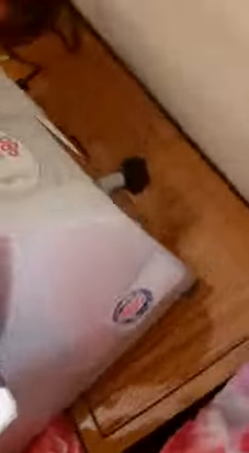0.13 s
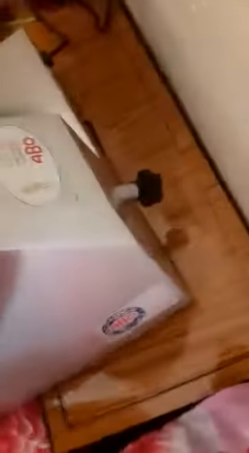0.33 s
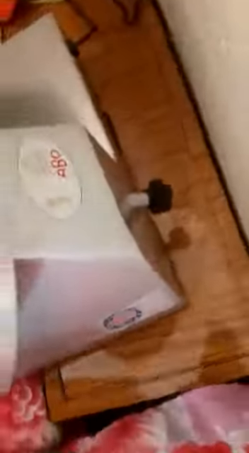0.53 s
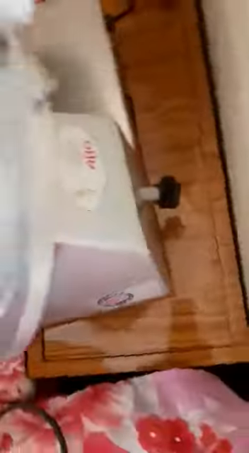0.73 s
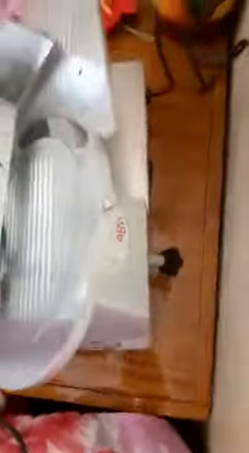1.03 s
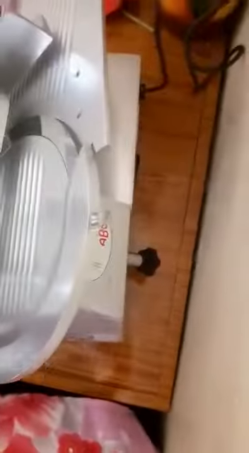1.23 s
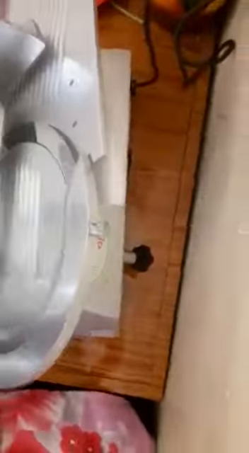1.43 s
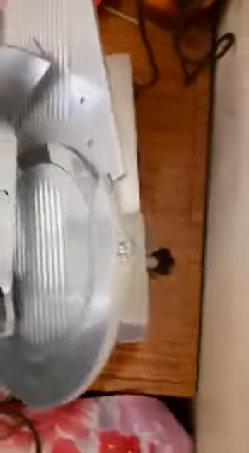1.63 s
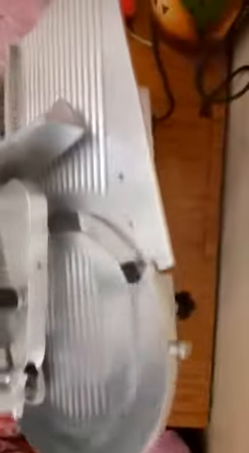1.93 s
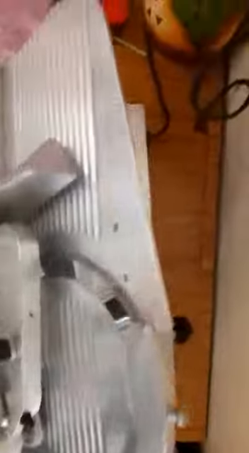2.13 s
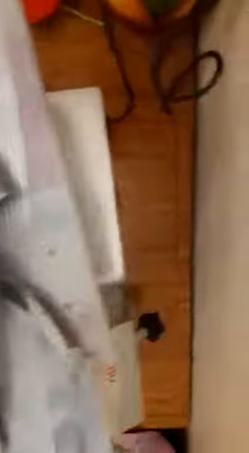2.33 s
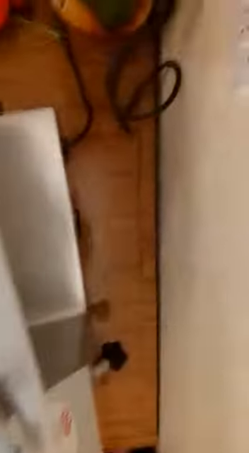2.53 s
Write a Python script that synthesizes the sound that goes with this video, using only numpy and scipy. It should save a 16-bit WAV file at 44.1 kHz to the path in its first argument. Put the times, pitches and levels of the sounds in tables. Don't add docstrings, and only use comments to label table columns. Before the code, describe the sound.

Constant low mains-like motor hum from a slicing machine, with a thin metallic ringing and soft hiss. Early bright handling ticks, brief low air puffs around one second, then a sharp knock near two seconds, recorded close indoors on a moving phone.

```python
import sys
import numpy as np
from scipy import signal
from scipy.fft import rfft, irfft, next_fast_len
from scipy.io import wavfile
from scipy.ndimage import uniform_filter1d

SR = 44100
rng = np.random.default_rng(int(sys.argv[2]) if len(sys.argv) > 2 else 0)


def bounce(signal):
    frames = np.transpose(np.atleast_2d(signal))
    limited = np.clip(frames, -1, 1)
    pcm = np.round(limited * 32767).astype(np.int16)
    wavfile.write(sys.argv[1], SR, pcm)


def voltage_ratio(level):
    return 10 ** (np.asarray(level, float) / 20)


N = 118188

HUM_HZ, HUM_PAN_DB = 100.16, 0.6
AIR_FADE_DB = -4


def evened(x):
    return x / np.sqrt(np.mean(x ** 2) + 1e-20)


def read(points, hz):
    f, value = np.transpose(points)
    return np.interp(np.log(hz + 1), np.log(f + 1), value)


def walk(column):
    # (time [s], hum level [dB], place [0-1], housing ring level [dB])
    stations = np.array([(0, -19.5, 0.15, -3), (.2, -20.5, 0.11, -1.5), (.55, -20, 0.22, 0.5),
                         (.87, -21, 0.32, 1.5), (1.1, -20, 0.5, 0.5), (1.45, -20.5, 0.53, 0),
                         (1.75, -19, 0.74, 1), (2.0, -18.5, 1, -2), (2.2, -18.3, 0.97, 4),
                         (2.43, -18.3, 0.97, -3.5), (2.54, -18, 1, 7.5), (2.68, -18.5, 0.53, 3.5)])
    return np.interp(np.arange(N) / SR, stations[:, 0], stations[:, column])


def panned(db):
    return voltage_ratio(np.array([[db / 2], [-db / 2]]))


def resonate(x, hz, width_hz):
    radius = np.exp(-np.pi * width_hz / SR)
    return signal.lfilter([1 - radius], [1, -2 * radius * np.cos(2 * np.pi * hz / SR), radius ** 2], x)


def pair(same):
    a, b = rng.standard_normal((2, N))
    same = np.clip(same, -1, 1)
    return np.array([a, same * a + np.sqrt(1 - same ** 2) * b])


def drift(hz):
    t = np.arange(0, N + 64, 64) / SR
    rates = hz * np.geomspace(.1, 1, num=12)
    slow = sum(np.sin(2 * np.pi * (f * t + rng.random())) for f in rates)
    return evened(np.interp(np.arange(N) / SR, t, slow))


def bursts(rows, edge_s):
    t = np.arange(N) / SR
    total = 0
    for start, length, db in rows:
        inside = np.minimum(t - start, start + length - t)
        total = total + voltage_ratio(db) * np.clip(inside / edge_s + .5, 0, 1)
    return total


def hiss(shape_db, same):
    a, b, c, d, patches = rng.standard_normal((shape_db.shape[-1], 513, 5)).T
    patches = uniform_filter1d(patches, size=12, axis=0)
    patches = evened(uniform_filter1d(patches, size=8, axis=1))
    left = a + 1j * b
    right = same * left + np.sqrt(1 - same ** 2) * (c + 1j * d)
    z = np.array([left, right]) * voltage_ratio(shape_db + 0.9 * patches)
    return signal.istft(z, nperseg=1024, noverlap=768)[1][:, :N]


def air():
    # (frequency [Hz], level [dB per Hz])
    air_spectrum = [(25, -11), (88, 9.5), (170, 5.5), (560, 0), (2300, -7.5), (4400, -15.5), (4900, -19),
                    (7000, -26.5)]
    # (frequency [Hz], left-right correlation [-1 to 1])
    coherence = [(25, .84), (60, .97), (250, .93), (640, .45), (1200, -.15), (3000, .02)]
    # (frequency [Hz], left-right level [dB])
    port_lean = [(60, .5), (500, 0), (1290, -2.5), (2380, -6), (4400, -2), (8000, 2)]
    hz = np.fft.rfftfreq(1024, 1 / SR)
    place = np.pad(walk(column=2)[::256], (0, 5), "edge")
    steady = read(air_spectrum, hz) - np.maximum(hz - 7000, 0) / 1000
    fade = AIR_FADE_DB * place / (1 + (hz[:, None] / 1500) ** 2)
    shape = steady[:, None] + fade
    lean = read(port_lean, hz)[:, None] / 2
    same = np.clip(read(coherence, hz), -1, 1)[:, None]
    x = hiss(np.array([shape + lean, shape - lean]), same)
    band = signal.butter(2, [600, 2200], "band", fs=SR, output="sos")
    return voltage_ratio(-47.5) * x / np.std(signal.sosfilt(band, x.mean(0)))


def puffs():
    # (start [s], length [s], level [dB])
    gusts = [
        (1.01, .07, -40),
        (1.1, 0.054, -34),
        (1.2, 0.09, -38),
        (2.53, 0.045, -35),
    ]
    band = signal.butter(2, [45, 111], "band", fs=SR, output="sos")
    return evened(signal.sosfilt(band, pair(-.3))) * bursts(gusts, .03)


def rubs():
    # (start [s], length [s], level [dB])
    slides = [(0, .1, -56), (.11, 0.091, -51.5), (.26, 0.095, -50), (.4, 0.24, -60.5), (.66, 0.055, -58),
              (.78, 0.2, -57.5), (1.36, 0.14, -59), (1.61, 0.13, -57.5), (1.88, .06, -59), (2.19, .05, -54),
              (2.32, 0.082, -51), (2.44, 0.03, -65), (2.63, 0.036, -58)]
    # (frequency [Hz], level [dB])
    friction = [(2500, -24), (5000, 2.5), (8000, -5.5), (9000, 0.5), (12000, -1.5), (15700, -4)]
    grip_db = -59.5
    hz = np.fft.rfftfreq(1024, 1 / SR)
    x = evened(hiss(read(friction, hz)[:, None] + np.zeros(N // 256 + 6), 0.044))
    level = np.hypot(bursts(slides, 0.041), voltage_ratio(grip_db))
    return x * panned(4.5) * level * voltage_ratio(1.6 * drift(60))


def ticks():
    # (time [s], level [dB], centre frequency [Hz], left-right level [dB])
    snaps = [
        (0.131, -48.5, 5000, 11.5),
        (0.164, -53, 6000, 6),
        (0.3816, -43, 8800, 4),
        (.4209, -41.5, 11000, 5),
        (0.9022, -44, 7400, 0),
        (1.9141, -39, 4250, 2),
        (1.914, -29.5, 2400, -2),
        (2.3256, -47, 8300, 5),
    ]
    case_t60_s, room_t60_s, room_db = 0.0084, 0.43, -4.5 - 14
    q = 7.5
    t = np.arange(8000) / SR
    shape = voltage_ratio(-60 * t / case_t60_s) + voltage_ratio(room_db - 60 * t / room_t60_s)
    out = np.zeros((2, N + 8000))
    draws = rng.standard_normal((len(snaps), 2, 8000))
    for (s, db, hz, pan_db), z in zip(snaps, draws):
        edges = [hz / (1 + 1 / q), min(hz * (1 + 1 / q), .45 * SR)]
        band = signal.butter(1, edges, "band", fs=SR, output="sos")
        snap = evened(signal.sosfilt(band, z)) * shape
        out[:, round(s * SR):][:, :8000] += voltage_ratio(db) * panned(pan_db) * snap
    return out[:, :N]


def thud():
    start_s, hz, level_db, t60_s = 1.903, 750, -42, .35
    t = np.maximum(np.arange(N) / SR - start_s, 0)
    return voltage_ratio(level_db - 60 * t / t60_s) * (t > 0) * evened(resonate(pair(.5), hz, 200))


def body():
    # (frequency [Hz], width [Hz], level [dB], left-right level [dB], left-right correlation [-1 to 1])
    modes = [(254, 47, -59.5, -16, 0.94), (385.7, 38, -46.5, -2, 1), (505, 230, -53, 7, 1),
             (965, 170, -55.5, 0, 0.29), (2400, 154, -62, -9, 0.66)]
    shudder = (98, 19.7, -38.5, HUM_PAN_DB, 1)
    out = 0
    for hz, width_hz, db, pan_db, same in modes + [shudder]:
        rumble = resonate(resonate(pair(same), hz, width_hz), hz, 2 * width_hz)
        level = voltage_ratio(db + AIR_FADE_DB * walk(column=2) * (200 < hz < 1500))
        out = out + level * panned(pan_db) * evened(rumble)
    return out


def ring():
    shaft_hz, ring_hz, width_hz = 42.5, 2603, 115
    knock_share = .45
    knocks = np.zeros(N)
    at = np.arange(0, N - 1, SR / shaft_hz).round().astype(int)
    knocks[at] = voltage_ratio(2.0 * rng.standard_normal(len(at)))
    drive = knock_share * evened(knocks) + np.sqrt(1 - knock_share ** 2) * pair(.7)
    rung = evened(resonate(resonate(drive, ring_hz, width_hz), ring_hz, 2 * width_hz))
    return voltage_ratio(-52.5 + walk(column=3) + 0.62 * drift(14)) * panned(-10) * rung


def slots():
    slot_hz, wobble_db = 942.2, 2
    # (left level [dB], right level [dB])
    slot_lines = [(-61.5, -62.5), (-59.5, -59), (-60.5, -58.5)]
    # (lower [dB], centre [dB], upper [dB])
    slot_fades = (1, -7, -2)
    t = np.arange(N) / SR
    out = 0
    for k, dbs in enumerate(slot_lines):
        port_shift = np.array([[0], [1]]) * .7 * drift(1)
        phase = 6 * rng.random() + .4 * drift(1.5) + port_shift
        wobble = wobble_db * np.array([drift(3.3), drift(2.805)])
        level = voltage_ratio(np.array(dbs)[:, None] + slot_fades[k] * walk(column=2) + wobble)
        line_hz = slot_hz + (k - 1) * HUM_HZ
        out = out + np.sqrt(2) * level * np.cos(2 * np.pi * line_hz * t + phase)
    return out


def hum():
    start_rad, skew_rad = 2.1, -4.6
    # (level at place 0 [dB], at 0.5 [dB], at 1 [dB], left-right [dB], left lead [rad])
    overtones = [(-43, -47, -56, -2.5, .35), (-42, -50, -48, 1, .45), (-42.5, -44.5, -47, .3, .65),
                 (-57, -62, -68, 3, .1)]
    hum_leads = (.04, .11, -.07)
    # (time [s], phase shift [rad])
    path_phase = [(0, .2), (1.5, -.2), (2.4, 0), (2.68, .5)]
    t = np.arange(N) / SR
    turn = 2 * np.pi * HUM_HZ * t + start_rad
    place, side = walk(column=2), np.array([[.5], [-.5]])
    lead = np.interp(place, [0, .6, 1], hum_leads)
    path = np.interp(t, *np.transpose(path_phase))
    out = voltage_ratio(walk(column=1)) * panned(HUM_PAN_DB) * np.cos(turn + skew_rad - side * lead + path)
    for k, (db0, db1, db2, pan_db, lead) in enumerate(overtones):
        level = voltage_ratio(np.interp(place, [0, .5, 1], [db0, db1, db2])) * panned(pan_db)
        out = out + level * np.cos((k + 2) * turn + skew_rad + side * lead)
    return np.sqrt(2) * out


def scene():
    low_cut_hz, edge_hz = 70, 15745
    noises = air() + puffs() + rubs() + ticks() + thud() + body() + ring()
    size = next_fast_len(N)
    hz = np.fft.rfftfreq(size, 1 / SR)
    noise_gain = (hz < edge_hz) * hz / np.hypot(hz, low_cut_hz)
    noises = irfft(rfft(noises, size) * noise_gain, size)[:, :N]
    return noises + slots() + hum()


def top_cut(x):
    return signal.sosfilt(signal.butter(12, 16340, fs=SR, output="sos"), x)


def record(dry):
    return top_cut(dry)


dry = scene()
out = record(dry)
bounce(out)
```